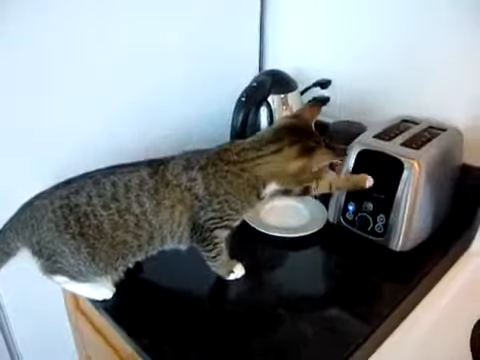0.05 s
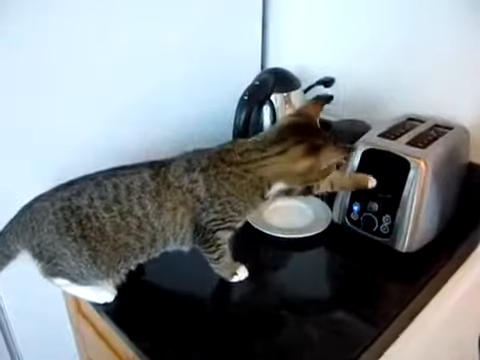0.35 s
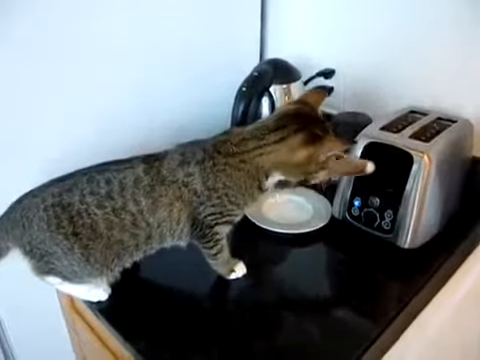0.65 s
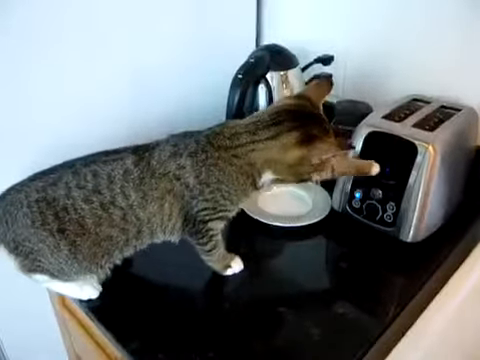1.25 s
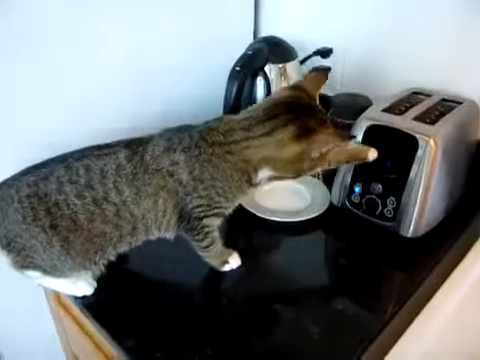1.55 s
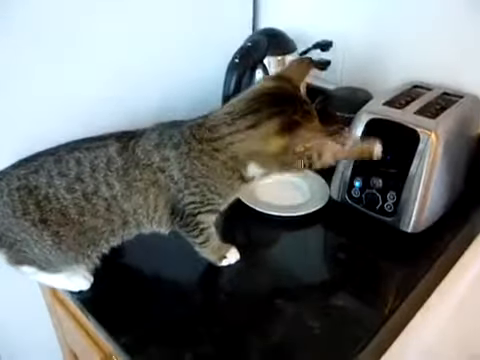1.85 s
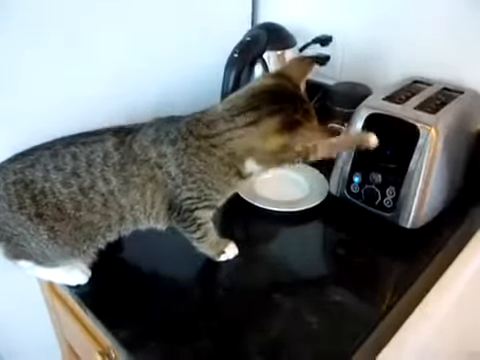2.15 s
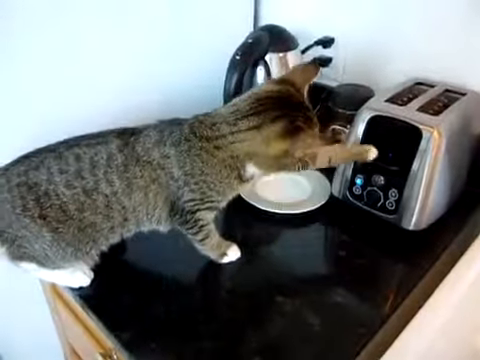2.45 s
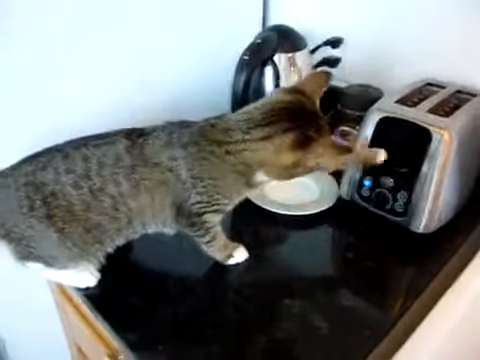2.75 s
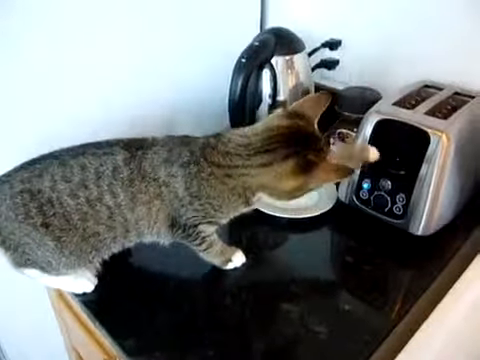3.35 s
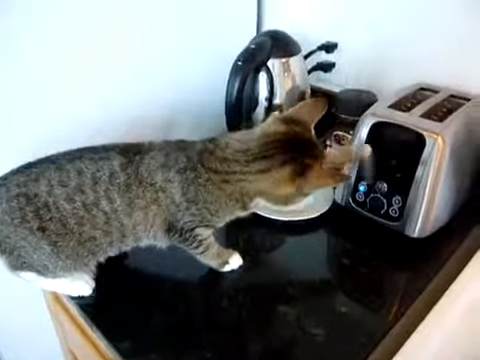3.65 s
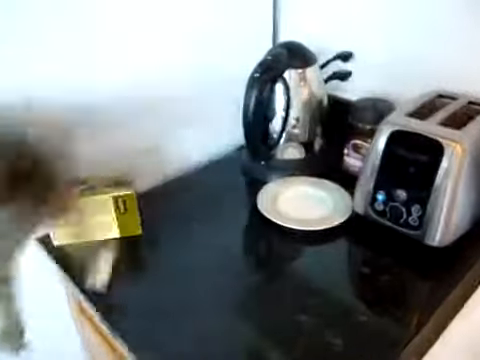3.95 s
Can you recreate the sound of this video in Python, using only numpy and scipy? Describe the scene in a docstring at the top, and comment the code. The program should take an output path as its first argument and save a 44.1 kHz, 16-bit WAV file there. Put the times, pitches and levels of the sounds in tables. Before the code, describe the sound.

A toaster popping up is the main sound, coming near the end. Before it, a low, steady room hum runs, with faint rustles around 1.5 to 2 seconds and 3.1 to 3.5. At about 3.7 seconds the toaster springs up with a loud clunk and a quick, ringing metal rattle, echoing briefly in the kitchen. At about 4 seconds a cat's paws thump softly on the worktop.

```python
"""Toaster startles a cat

A low room drone and a few faint rustles; then a toaster pops up on a kitchen worktop.
The latch lets go, the sprung carriage rattles up, slams into its stop and bounces,
ringing the wire cage and the shell. The cat jumps back and lands with a soft thump."""
import sys
import numpy as np
from scipy import signal
from scipy.fft import irfft
from scipy.io import wavfile
from scipy.ndimage import uniform_filter1d

SR = 44100
rng = np.random.default_rng(int(sys.argv[2]) if len(sys.argv) > 2 else 0)


def store_pcm(level_fs):
    """Save levels as 16-bit WAV."""
    pcm = np.round(np.clip(level_fs, -1, 1) * 32767).astype(np.int16)
    wavfile.write(sys.argv[1], SR, np.atleast_2d(pcm).T)


N = 176400


def undb(db):
    """Decibels to gain."""
    return 10 ** (np.asarray(db) / 20)


def unit(x):
    """Scale to rms 1."""
    return x / np.sqrt(np.mean(x ** 2))


def noise(colour, size):
    """Noise of rms 1, shaped by (freq_hz, density_db) points, rolling off outside them."""
    hz, db = np.array(colour, float).T
    f = np.maximum(np.arange(size // 2 + 1) * SR / size, 1)
    gain = undb(np.interp(np.log(f), np.log(hz), db))
    rolloff = np.minimum(f / hz[0], 1) ** 2 * np.minimum(hz[-1] / f, 1) ** 2
    return unit(irfft(gain * rolloff * np.exp(2j * np.pi * rng.random(len(f))), size))


def walk(rate_hz):
    """Random wander of rms 1."""
    hold = int(SR / rate_hz)
    steps = np.repeat(rng.standard_normal(N // hold + 1), hold)
    return unit(uniform_filter1d(steps, hold)[:N])


def fade(t, t60_s):
    """Exponential decay."""
    return np.exp(-np.log(1000) * t / t60_s)


def add(out, start_s, sound):
    """Mix a sound in at start_s."""
    i = int(start_s * SR)
    out[i:i + len(sound)] += sound[:max(N - i, 0)]


def ring(modes, t, scatter_db=1):
    """Decaying modes; each blow lands on another spot and weights them anew."""
    hz, db, t60_s = np.array(modes, float).T
    gain = undb(db + scatter_db * rng.standard_normal(len(hz))) / np.sqrt(np.sum(undb(db) ** 2) / 2)
    turns = hz[:, None] * t + rng.random((len(hz), 1))
    return gain @ (np.sin(2 * np.pi * turns) * fade(t, t60_s[:, None]))


def burst(colour, t, t60_s):
    """Dense modes that die together."""
    return noise(colour, size=len(t)) * fade(t, t60_s)


def spot(x, pitch_hz, width_hz=350, boost_db=7):
    """The strike point favours modes near one pitch; energy is unchanged."""
    near = signal.lfilter(*signal.iirpeak(pitch_hz, pitch_hz / width_hz, fs=SR), x)
    return unit(x + undb(boost_db) * near) * np.std(x)


def room_drone():
    """Low noise with wavering hums and whines, like a distant fan; the midrange level drifts."""
    # noise spectrum: freq_hz, density_db
    colour = [(55, -26.5), (85, -14.5), (135, -2.5), (270, 0.5), (395, -4.5), (460, -3.5), (590, -8),
              (680, -4.5), (760, -11), (930, -5.5), (1080, -12), (1500, -16), (1900, -23), (2500, -23),
              (3600, -27), (5500, -28), (6500, -30), (7800, -35.5), (9400, -52.5)]
    # hums and whines: pitch_hz, half_width_hz, level_db
    hums = [(174.3, 3.9, -64), (228.8, 4.8, -59), (280.5, 12, -53), (346.3, 9.5, -57.5),
            (375.3, 2.3, -70.5), (419, 1.1, -70), (466.4, 8, -61), (654, 11, -64.5), (694.3, 4.3, -67),
            (814, 2.5, -64), (921.4, 4.3, -61), (2500, 1.5, -79.5), (2530, 2.2, -79), (2585, 2, -76),
            (2829, 2.4, -79), (6364, 6, -81.5)]
    # midrange drift: time_s, gain_db
    drift = [(0, -1.5), (1.4, 0), (1.8, 0.2), (2.3, 1), (2.8, -0.1), (2.95, -2.5), (3.2, 1), (3.7, -1)]
    out = undb(-47 + 0.66 * walk(rate_hz=6.2)) * noise(colour, size=N)
    f = np.arange(N // 2 + 1) * SR / N
    for pitch_hz, half_width_hz, level_db in hums:
        phases = np.exp(2j * np.pi * rng.random(len(f)))
        band = irfft(phases / (1 + ((f - pitch_hz) / half_width_hz) ** 2), N)
        out += undb(level_db + 0.6 * walk(rate_hz=4)) * unit(band)
    midrange = signal.sosfiltfilt(signal.butter(2, (750, 1490), "band", fs=SR, output="sos"), out)
    drift_db = np.interp(np.arange(N) / SR, *np.array(drift).T)
    return out + midrange * (undb(drift_db) - 1)


def rustles():
    """Faint, uneven brushing that swells and fades."""
    # swells: centre_s, length_s, level_db
    swells = [(1.6, 0.26, -57.5), (1.748, 0.12, -56.5), (1.895, 0.12, -55.5), (2.019, 0.04, -56.5),
              (3.154, 0.22, -58.5), (3.417, .05, -57), (3.499, 0.075, -57.5)]
    # rustle spectrum: freq_hz, density_db
    colour = [(500, -9), (1000, 0), (1600, 6.5), (2800, -4.5), (4200, -4), (5800, -3), (7500, -21.5),
              (9500, -32)]
    t = np.arange(N) / SR
    envelope = sum(undb(level_db) * np.cos(np.pi * np.clip((t - centre_s) / length_s, -.5, .5))
                   for centre_s, length_s, level_db in swells)
    return envelope * undb(0.86 * walk(rate_hz=90)) * noise(colour, size=N)


def kitchen(x, tail_db=-5, delay_s=0.0066, split_hz=2500):
    """Close, hard walls add a short tail whose treble dies first."""
    t = np.arange(SR // 2) / SR
    scatter = rng.standard_normal(len(t))
    low = signal.sosfilt(signal.butter(2, split_hz, fs=SR, output="sos"), scatter)
    high = signal.sosfilt(signal.butter(2, split_hz, "high", fs=SR, output="sos"), scatter)
    tail = (low * fade(t, t60_s=0.38) - high * fade(t, t60_s=0.27)) * (t > delay_s)
    return x + undb(tail_db) * signal.fftconvolve(x, tail / np.linalg.norm(tail))[:N]


def cat_paws(contact_s=0.0017):
    """Soft pads thump the worktop."""
    # paw landings: start_s, level_db
    landings = [(3.9800, -31), (3.987, -29.5)]
    # thump spectrum: freq_hz, density_db
    colour = [(30, -6), (100, -8), (170, -10), (290, -9), (400, -10), (520, 4.5), (750, -6), (1200, -12.5),
              (3000, -21.5), (8000, -34)]
    # thump modes: pitch_hz, level_db, t60_s
    modes = [(277, -9, 0.15), (530, -4, 0.15), (694, -14, 0.081)]
    out, t = np.zeros(N), np.arange(SR // 2) / SR
    for start_s, level_db in landings:
        thump = burst(colour, t, t60_s=0.1) + undb(-2.5) * ring(modes, t)
        add(out, start_s, undb(level_db) * thump * np.minimum(t / contact_s, 1))
    return out


def carriage_slide(start_s=3.724, stop_s=3.777, final_db=-30, rise_db=15, chatter_db=2):
    """The carriage chatters up its guide rod, louder as it gains speed, until it meets the stop."""
    # chatter spectrum: freq_hz, density_db
    colour = [(1200, -19), (2600, -3), (4400, 1), (5500, -5), (7000, -1.5), (7800, -9), (9500, -19)]
    travel = (np.arange(N) / SR - start_s) / (stop_s - start_s)
    level_db = final_db + rise_db * (np.clip(travel, 0, 1) - 1) + chatter_db * walk(rate_hz=600)
    return (travel > 0) * (travel < 1) * undb(level_db) * noise(colour, size=N)


def carriage_blows(contact_s=0.0012):
    """Each blow thuds on the worktop, clunks in the toaster's body, rings shell and cage, and clicks."""
    # blows: start_s, thud_db, body_db, shell_db, cage_db, click_db, cage_hz, click_hz
    blows = [(3.718, -60, -52, -39, -47, -62, 4000, 5430),
             (3.7224, -41, -22.5, -18.5, -25.5, -45, 4600, 5400),
             (3.7279, -53, -35, -31, -22, -31, 4230, 5850),
             (3.7380, -27.5, -26, -28.5, -26, -40, 4600, 6100),
             (3.7470, -23.5, -35, -20.5, -24.5, -44, 4030, 6100),
             (3.7762, -40, -38.5, -42, -17, -19.5, 4860, 6540),
             (3.7786, -33, -30, -20, -27, -33, 3970, 5340), (3.7928, -27, -21.5, -34, -30, -33, 4060, 6700),
             (3.8050, -28, -38, -33, -28, -30.5, 4000, 6160),
             (3.8173, -48, -49, -30.5, -22.5, -27, 3900, 6160),
             (3.836, -35.5, -51, -30, -26.5, -46, 4300, 6130),
             (3.8530, -58, -52, -38, -50, -32, 4650, 5600), (3.8690, -46, -31, -48, -46, -40, 4100, 5630),
             (3.884, -55, -54, -33, -24, -19.5, 4700, 5640), (3.8862, -45, -36, -33, -18, -30, 4360, 6130),
             (3.9030, -51, -40, -33.5, -34, -30, 4480, 5270)]
    # modes of each part: pitch_hz, level_db, t60_s
    thud_modes = [(147.4, -14, 0.45), (176.5, -16, 0.41), (313.8, -4.5, 0.12), (331.4, -9.5, 0.072)]  # toaster on the worktop
    body_modes = [(465, -2, 0.098), (498.5, 3, 0.081), (530, -8, .08), (646, -13.5, 0.14)]  # hollow body
    shell_modes = [(767, -8.5, 0.28), (945, 3, 0.057), (1005, -6, 0.15), (1088, 0, 0.2), (1220, 3.5, 0.079),
                   (1300, 3, 0.13), (1415, -16, 0.13), (1459, -15, 0.23), (1530, -21, 0.12),
                   (1818, 4.5, 0.076), (1817, -10, 0.36), (2060, -25, 0.21), (2280, -6, 0.14),
                   (2407, -2, 0.18)]  # sheet-metal shell
    cage_modes = [(3460, -9, .12), (3540, -3, .12), (3800, -8, 0.11), (3980, -2, .11), (3996, -0.5, .14),
                  (4100, -1.5, 0.12), (4350, -5.5, 0.086), (4380, -8, 0.088), (4650, -8, .11),
                  (4540, -4.5, 0.064), (4730, 2.5, 0.062), (5140, -12, .11), (6110, -11, .17),
                  (6720, -20, .17)]  # wire cage and carriage
    # spectra of the dense modes: freq_hz, density_db
    thud_colour = [(35, 5), (80, -2), (170, -10), (320, 5.5), (420, -20), (900, -44)]
    body_colour = [(250, -20), (400, -11.5), (500, 0.5), (620, -8), (750, -4.5), (1500, -44)]
    shell_colour = [(300, -11), (760, -10), (1150, 4), (1750, 1.5), (2100, -5), (2500, -1), (3400, -6),
                    (6000, -8), (9500, -59)]
    cage_colour = [(1500, -38), (3700, -35), (4000, -1), (4650, 2), (4900, -9.5), (7000, -17),
                   (9500, -35.5)]
    click_colour = [(1000, -24.5), (3300, -3.5), (4200, -11), (5200, 0), (6100, -1.5), (6400, -6),
                    (6750, 3.5), (7500, -10), (9400, -20.5)]
    out, t = np.zeros(N), np.arange(SR // 2) / SR
    for start_s, thud_db, body_db, shell_db, cage_db, click_db, cage_hz, click_hz in blows:
        thud = undb(-6) * ring(thud_modes, t) + undb(-6.5) * burst(thud_colour, t, t60_s=0.1)
        body = undb(-1) * ring(body_modes, t) + undb(-7) * burst(body_colour, t, t60_s=0.06)
        shell = undb(-6.5) * ring(shell_modes, t) + undb(0.5) * burst(shell_colour, t, t60_s=0.058)
        cage = undb(-6) * ring(cage_modes, t) + undb(-0.5) * burst(cage_colour, t, t60_s=0.055)
        click = burst(click_colour, t, t60_s=0.048)
        blow = undb(thud_db) * thud + undb(body_db) * body + undb(shell_db) * shell
        blow += undb(cage_db) * spot(cage, cage_hz) + undb(click_db) * spot(click, click_hz)
        add(out, start_s, blow * np.minimum(t / contact_s, 1))
    return out


def scene():
    """Toaster and cat in the kitchen, over rustles and drone; mono."""
    toaster = carriage_blows() + carriage_slide()
    return (kitchen(toaster + cat_paws()) + rustles() + room_drone())[None]


def record(dry, cutoff_hz=9550, dc_offset=-.0423):
    """Steep low-pass and a small DC offset."""
    return signal.sosfilt(signal.ellip(10, .2, 70, cutoff_hz, fs=SR, output="sos"), dry) + dc_offset


dry = scene()
out = record(dry)
store_pcm(out)
```